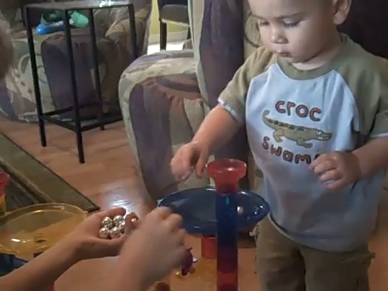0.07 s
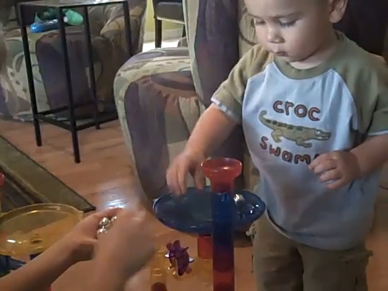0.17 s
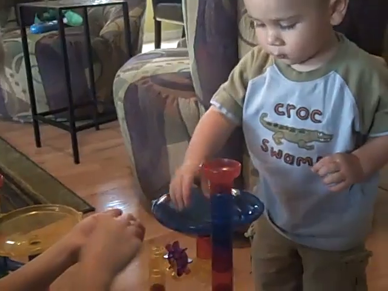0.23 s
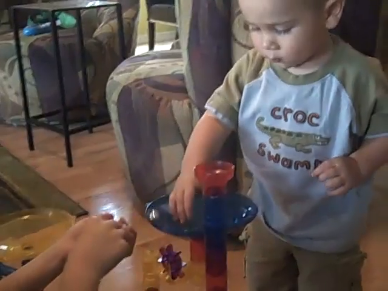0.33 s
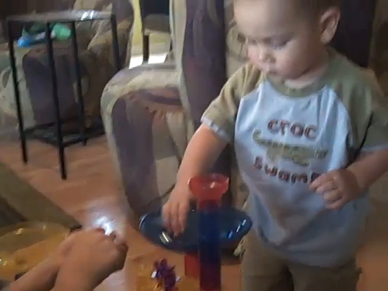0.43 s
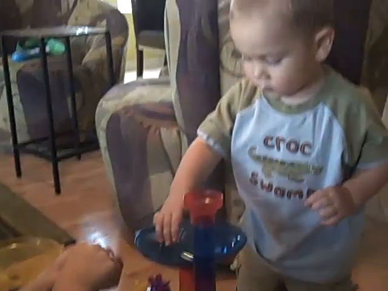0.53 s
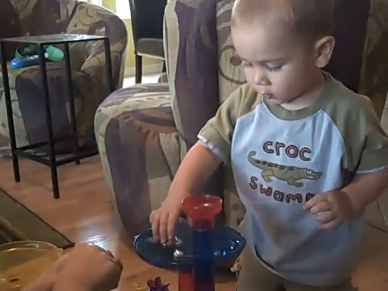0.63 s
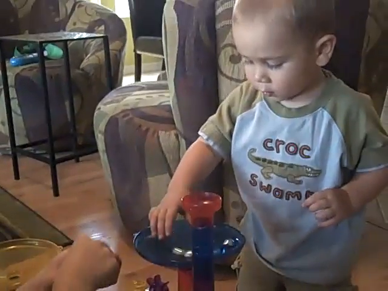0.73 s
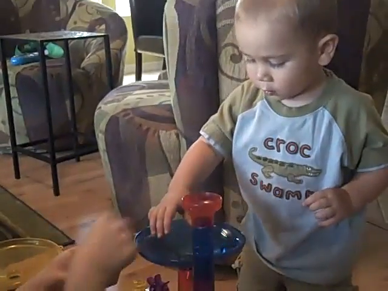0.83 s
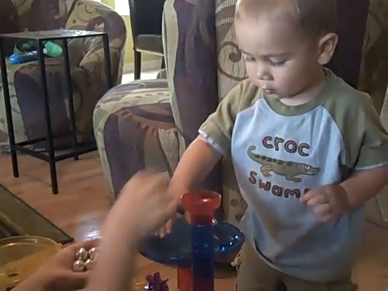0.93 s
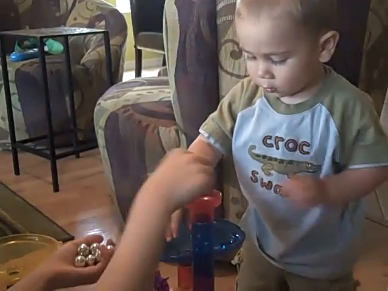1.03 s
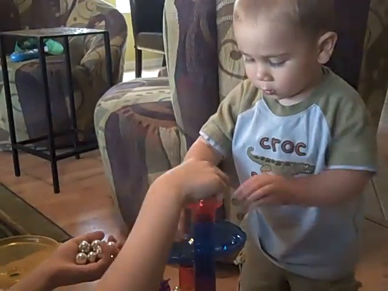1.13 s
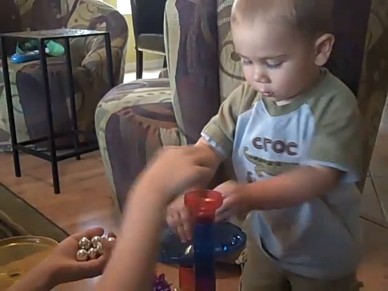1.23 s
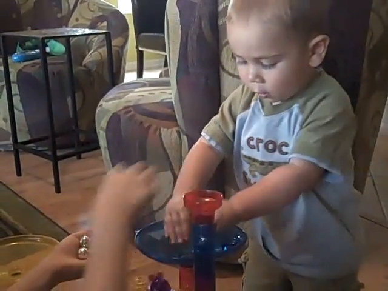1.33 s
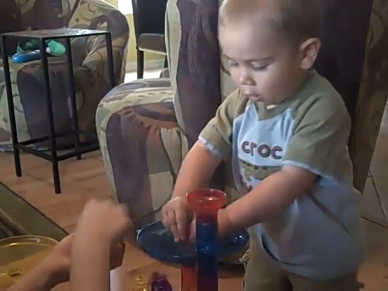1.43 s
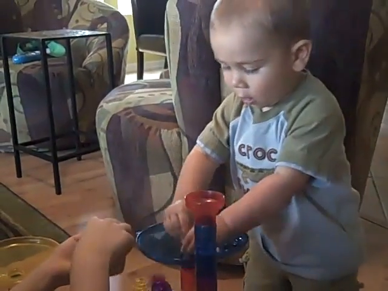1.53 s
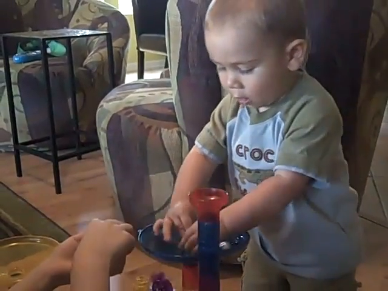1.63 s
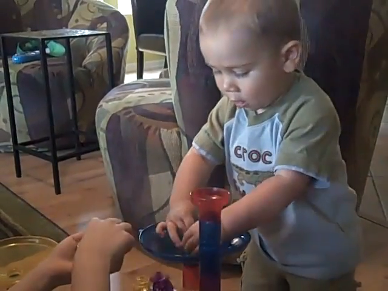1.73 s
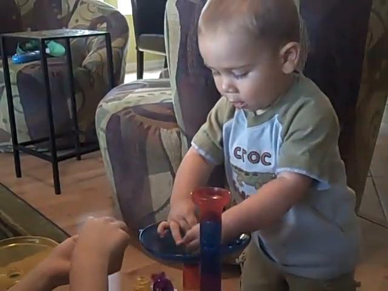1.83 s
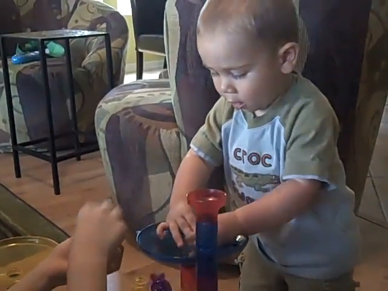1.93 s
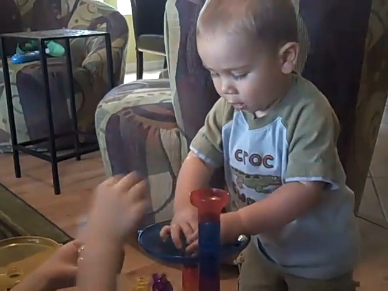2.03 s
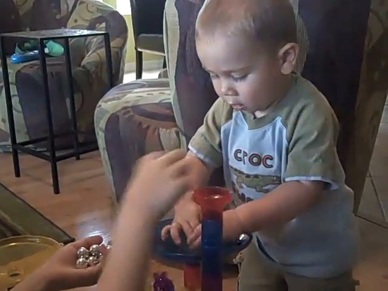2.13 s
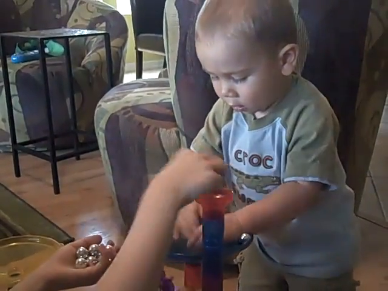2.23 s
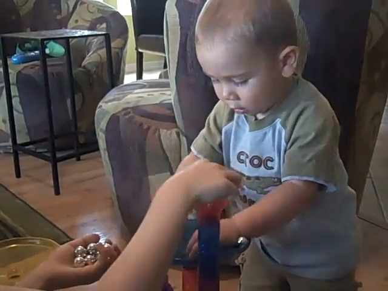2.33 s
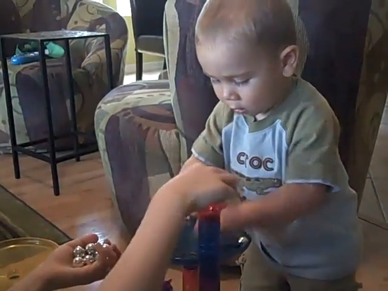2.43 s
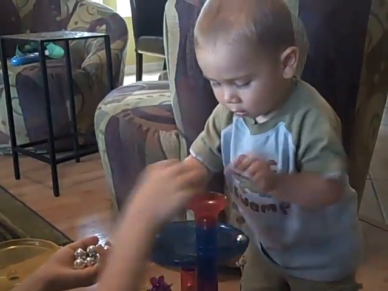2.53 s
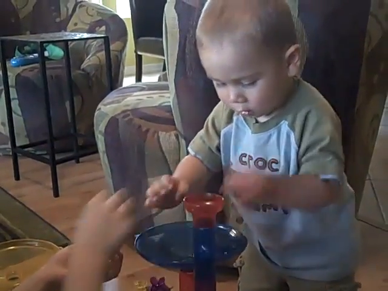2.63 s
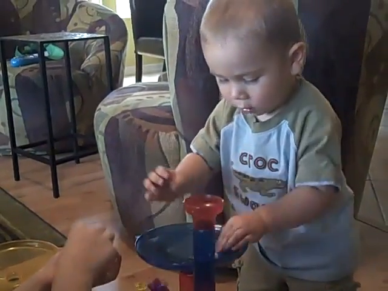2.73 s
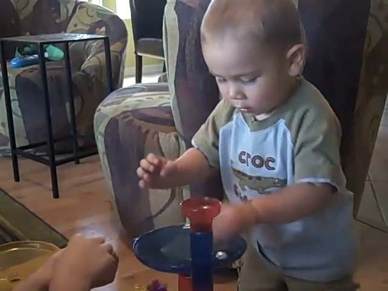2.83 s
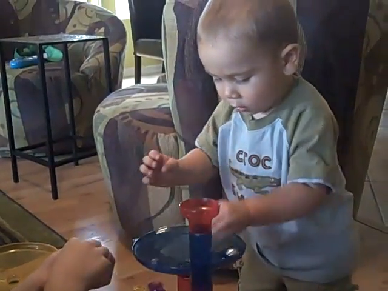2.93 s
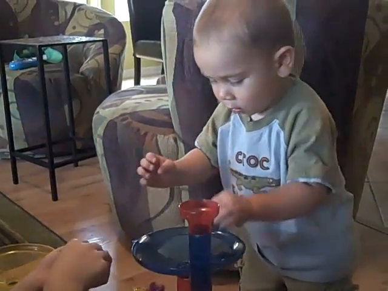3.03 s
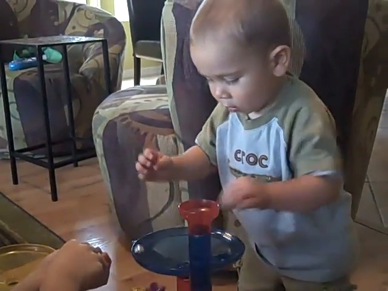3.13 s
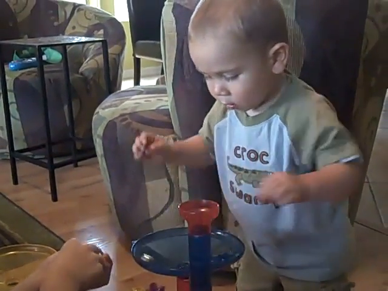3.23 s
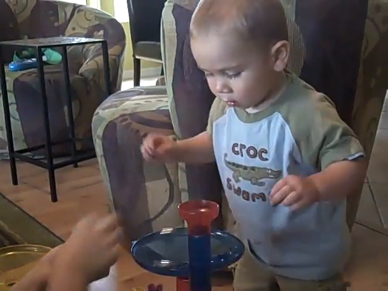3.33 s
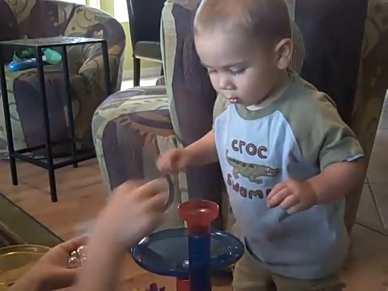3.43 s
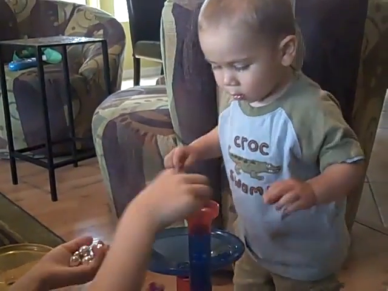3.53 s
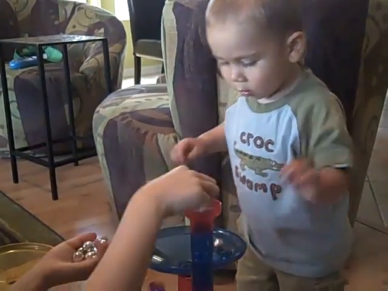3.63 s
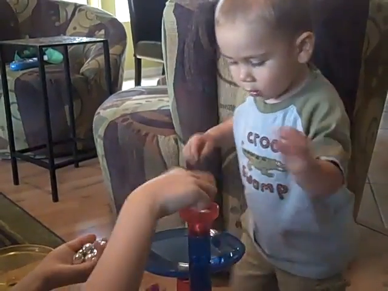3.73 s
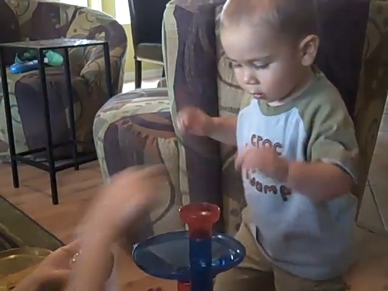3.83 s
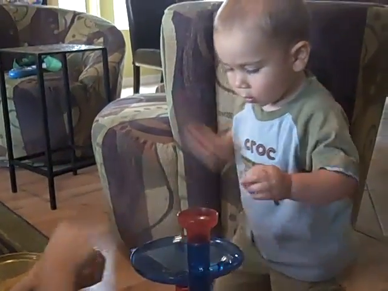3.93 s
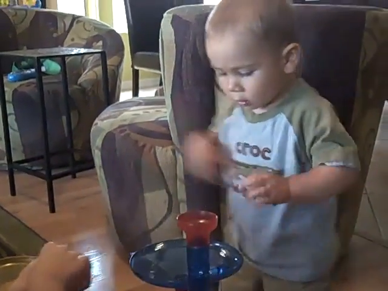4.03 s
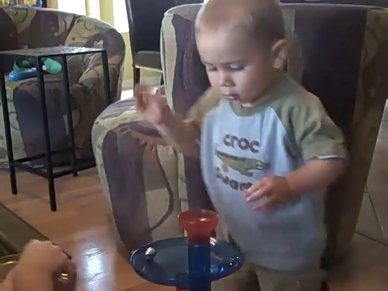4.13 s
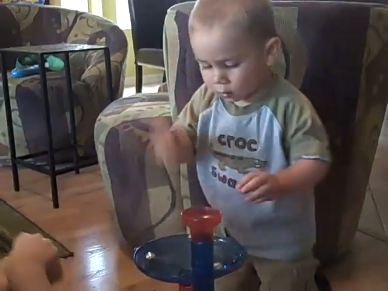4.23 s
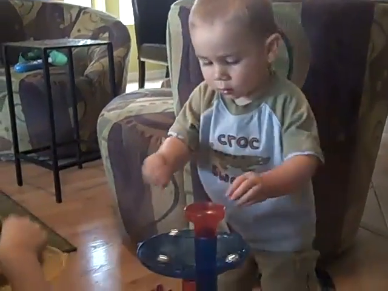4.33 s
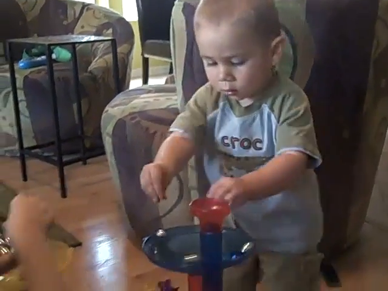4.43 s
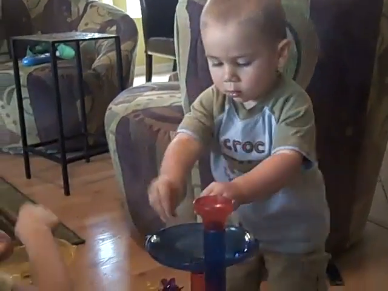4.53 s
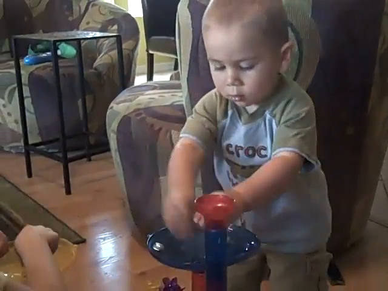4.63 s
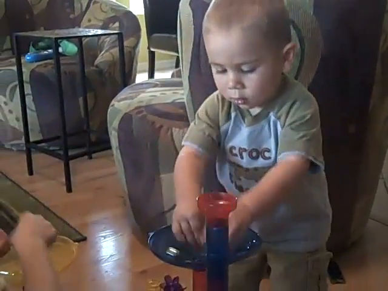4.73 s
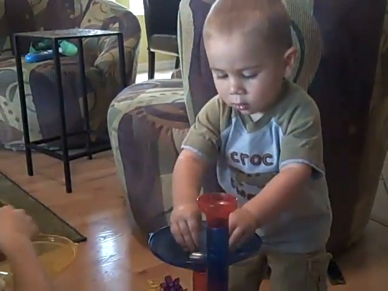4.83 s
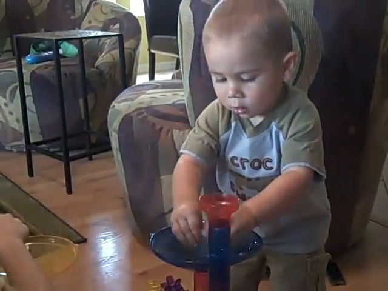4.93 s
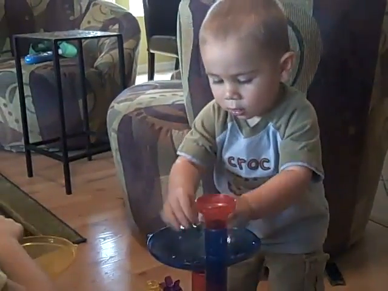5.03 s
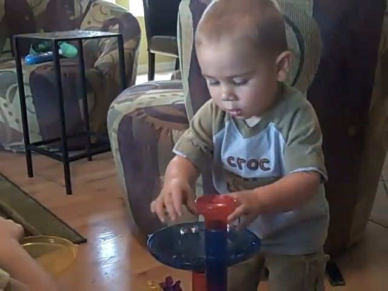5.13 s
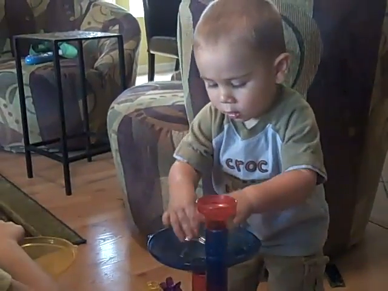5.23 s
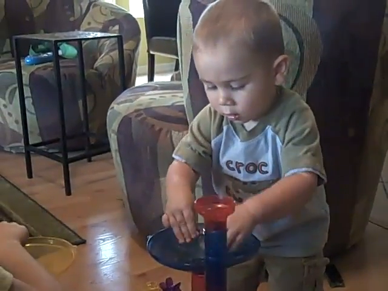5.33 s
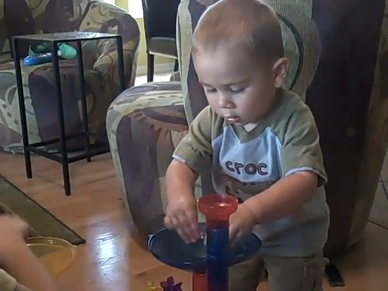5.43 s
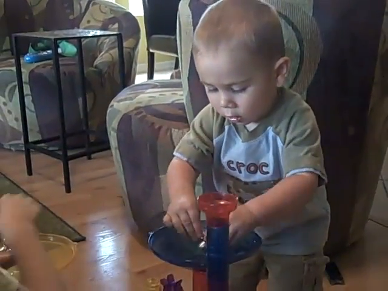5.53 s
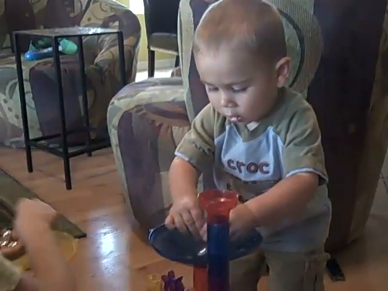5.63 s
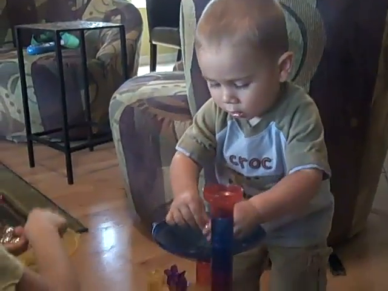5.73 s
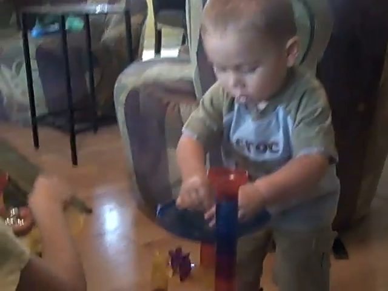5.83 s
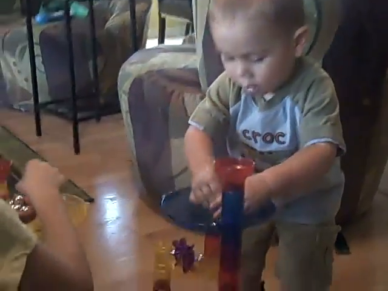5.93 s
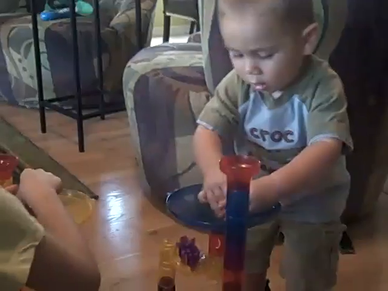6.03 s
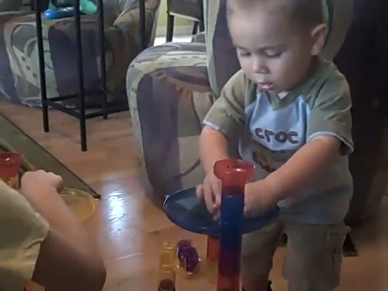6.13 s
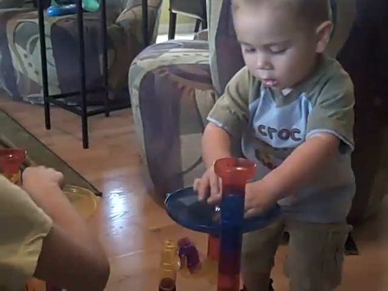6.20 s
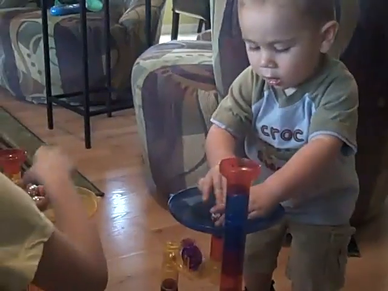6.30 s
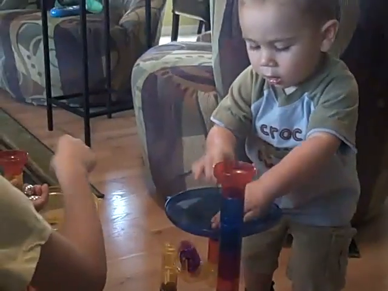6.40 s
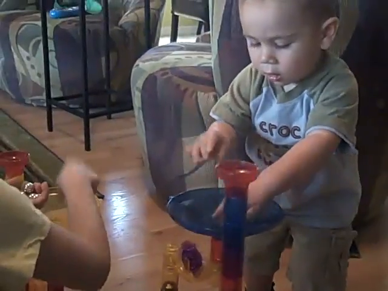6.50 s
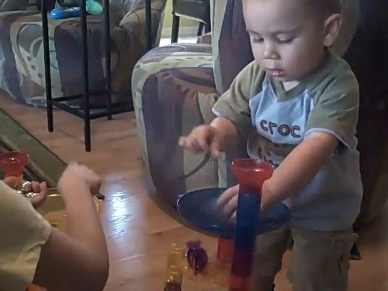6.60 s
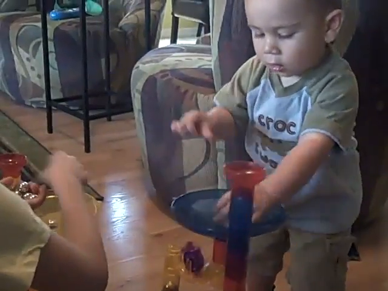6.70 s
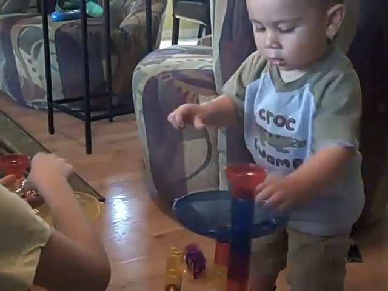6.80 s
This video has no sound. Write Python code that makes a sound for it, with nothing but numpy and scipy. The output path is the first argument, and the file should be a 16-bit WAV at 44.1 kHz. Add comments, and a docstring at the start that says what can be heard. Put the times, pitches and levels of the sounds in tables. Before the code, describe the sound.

Marbles rattle in a plastic toy bowl about a metre from the microphone. It starts silent, then opens on faint room air and weak ticks before a burst of hard clacks. Irregular knocks continue, brighter on rim and tube, hollower on the bowl, with grainy rolling swelling after each. The middle is lighter; the end turns busy and loud. The living room adds a short reverberation, and some strong hits overload with a low pop.

```python
"""A furnished living room with a short tail, the microphone about a metre from a toy marble run.
Marbles roll round its plastic bowl while small hands chase them and more are dropped in: trains of tiny impacts.
They knock the bowl, rim, tubes and each other: noise bursts with rebounds that set thin plastic ringing.
Clinks, bouncing marbles and soft bumps join in over quiet indoor air; some hard hits overload the microphone."""
import sys
import numpy as np
from scipy import signal
from scipy.io import wavfile
from scipy.ndimage import uniform_filter1d

SR = 44100
rng = np.random.default_rng(int(sys.argv[2]) if len(sys.argv) > 2 else 0)


def file_out(sig):
    """Save sig as 16-bit WAV at sys.argv[1]."""
    # one column per channel
    cols = np.atleast_2d(sig).T
    # limit, then scale
    lim = np.clip(cols, -1, 1)
    pcm = np.round(lim * 32767).astype(np.int16)
    wavfile.write(sys.argv[1], SR, pcm)


N = 302600

# spectrum of the quiet indoor air: freq_hz, relative gain_db
AIR_COLOUR = [(20, 5), (250, -10.5), (600, -7), (2000, -36.5), (16000, -53)]
# reverberation of the living room: freq_hz, t60_s
ROOM_DECAY = [(200, 1), (1400, 0.57), (4000, 0.56), (9000, 0.31), (16000, 0.44)]
# how briskly the marbles move between knocks: start_s, relative roll_db, relative skitter_db
MOTION = [(0.37, -44.5, -51.5), (0.79, -46, -53), (1.07, -43, -70), (1.43, -49.5, -44.5), (2.16, -45, -39),
          (2.59, -47.5, -49), (2.72, -44, -37.5), (3.7, -44, -45), (4.04, -43.5, -34), (4.24, -53, -45.5),
          (4.51, -48.5, -50), (4.89, -43, -37), (5.39, -47, -42.5), (5.72, -51, -49), (5.97, -37, -29.5),
          (6.12, -41, -37), (6.32, -43.5, -39.5), (6.86, -38.5, -35.5)]
# spectrum of the rolling: freq_hz, relative gain_db
ROLL_COLOUR = [(100, -15), (400, -12.5), (800, -5), (1300, -2.5), (2000, 1), (3000, 1.5), (5000, -30.5),
               (12000, -13)]
# spectrum of the skittering: freq_hz, relative gain_db
SKITTER_COLOUR = [(300, -2.5), (1200, -6), (2500, -2), (3700, 2), (5000, -1), (7000, -4.5), (10000, -5),
                  (13000, -11.5), (16000, -8)]
# modes of the bowl: pitch_hz, width_hz, relative level_db
BOWL_MODES = [(694, 31, -13), (996, 25, 3), (1220, 45, -49), (1265, 32, 1), (1405, 55, 2), (1523, 47, 2),
              (1612, 39, -3), (1870, 17, 4.5), (1943, 68, -8.5), (2600, 870, -2.5), (2880, 430, -10),
              (3620, 110, 4.5), (3680, 51, 5)]
# modes of the upright tube: pitch_hz, width_hz, relative level_db
TUBE_MODES = [(3500, 35, -1), (3590, 24, 4)]
# soft hollow bumps: start_s, relative level_db, pitch_hz
BUMPS = [(3.918, -41, 640), (4.18, -37, 590)]
# low pulses of the overloaded microphone at some hard hits: hit_s, relative level_db
OVERLOADS = [(1.296, -20.5), (1.542, -30), (1.816, -40.5), (2.118, -41), (2.902, -39), (3.251, -32.5),
             (3.991, -36.5), (4.083, -44), (4.817, -31.5), (5.91, -31.5), (6.674, -34), (6.765, -38)]
# small hard contacts that ring on one note: start_s, level_db, pitch_hz
CLINKS = [(1.0758, -25, 3240), (1.4576, -30, 3620), (2.1084, -30.5, 6000), (2.207, -36, 4140),
          (2.851, -29, 8250), (2.9023, -29, 9400), (6.2343, -35.5, 3300), (6.4886, -25.5, 9230)]
# a marble bounces on one hard, ringing spot: start_s, level_db, pitch_hz, first_flight_s
BOUNCES = [(1.2973, -32.5, 3580, .0385), (5.405, -32.5, 3460, 0.018)]
# a marble hits plastic and may chatter on: start_s, level_db, spot_pitch_hz,
# hardness as treble tilt_db_per_octave, chatter_s
KNOCKS = [(0.253, -37.5, 2050, -2.5, 0.0098), (0.4478, -32, 7750, -1, 0.074), (0.804, -34, 1530, -5, 0.067),
          (0.92, -22, 4280, 1.5, 0.036), (0.9831, -26.5, 1620, 1.5, 0.037), (1.034, -26, 1480, 2.5, 0),
          (1.064, -20.5, 3150, -2, 0.026), (1.0853, -23.5, 1640, 3, 0.0066),
          (1.1142, -24, 1340, -6.5, 0.013), (1.1444, -24, 1340, -0.5, 0.015),
          (1.2967, -22.5, 9500, 3, 0.016), (1.3359, -22, 8300, -0.5, 0.006),
          (1.5151, -19.5, 3220, 1.5, 0.045), (1.524, -19.5, 3330, -3.5, 0.0048),
          (1.543, -18.5, 5070, 0.5, 0.058), (1.755, -27.5, 3300, 2.5, 0.013), (1.825, -23, 2750, 3, 0.029),
          (1.892, -20.5, 7400, 2.5, 0), (1.9943, -27, 3900, 4.5, 0.005), (2.021, -25.5, 7050, 7, 0.048),
          (2.1199, -24, 6500, 5.5, 0.0081), (2.2196, -25.5, 4740, 3, .032),
          (2.2859, -24.5, 1650, -1.5, 0.021), (2.3024, -22, 1530, 0, 0.043),
          (2.373, -29, 4800, -0.5, 0.018), (2.4238, -29, 2490, 1.5, 0.0017),
          (2.509, -25.5, 3640, 1.5, 0.0066), (2.572, -27.5, 3550, 1, 0.078),
          (2.6639, -23, 1660, -2.5, 0.019), (2.7408, -29, 1440, -1.5, 0), (2.7829, -28.5, 3420, 1.5, 0.016),
          (2.8308, -25.5, 3900, 3, 0.056), (2.986, -31.5, 4130, -1.5, 0.0068),
          (3.0947, -27, 3700, 1, 0.029), (3.14, -26, 3780, 2, 0.028), (3.2519, -23.5, 5700, 4, 0),
          (3.318, -31.5, 3020, -0.5, 0.035), (3.4028, -27.5, 5830, 2, 0.02),
          (3.4264, -27.5, 3100, 3.5, 0.059), (3.6114, -30, 1430, -0.5, 0), (3.695, -24.5, 3080, 6.5, 0.027),
          (3.875, -31, 8600, -0.5, 0), (3.915, -25.5, 3300, 2.5, .016), (3.993, -26, 8200, 4, .055),
          (4.0832, -26.5, 6030, 6, 0.0066), (4.208, -26.5, 3800, 5.5, .025), (4.4381, -32.5, 3980, 0, 0),
          (4.5302, -31, 2430, -2, 0), (4.6124, -30.5, 3670, 7, 0), (4.7085, -27, 2640, 0, 0.014),
          (4.7388, -23.5, 5020, 0, 0), (4.8168, -20.5, 2540, 0.5, 0.0086), (4.8832, -24, 1870, -0.5, 0.049),
          (5.0847, -28.5, 5600, -1, 0), (5.211, -23, 2430, 2.5, 0.034), (5.2476, -26.5, 4400, 2, .06),
          (5.375, -26.5, 3470, 4, 0.035), (5.4056, -30, 1870, -2.5, 0.17), (5.664, -28.5, 2830, -0.5, 0),
          (5.711, -27, 2800, -0.5, 0), (5.7824, -31.5, 2920, 1, 0.0066), (5.869, -26, 2070, 0.5, 0.089),
          (5.911, -18.5, 2600, 0.5, 0.004), (5.9191, -28.5, 1280, -9.5, 0), (5.9763, -25, 1580, -1, 0.04),
          (5.9974, -24.5, 1820, -0.5, 0.052), (6.1096, -23.5, 5170, 1, 0.041),
          (6.2433, -25.5, 3220, -3.5, 0.001), (6.341, -24, 4700, -2, 0.014),
          (6.3809, -24.5, 1430, 0, 0.014), (6.4346, -26, 2830, -0.5, 0.0066),
          (6.5205, -21.5, 3300, -3, 0.031), (6.5891, -26.5, 2600, 2.5, 0.013),
          (6.6284, -21, 4040, 3.5, 0.055), (6.675, -21.5, 4900, -0.5, 0.02),
          (6.7379, -19.5, 3780, -0.5, 0.021), (6.7658, -23, 6370, 7, 0.02), (6.83, -27, 1910, -2.5, 0.083)]
# spectrum shared by knocks and the ticks of clinks: freq_hz, relative gain_db
KNOCK_COLOUR = [(100, -27), (400, -24.5), (700, -17), (1000, -10), (1400, 0), (2000, 0.5), (2600, 1),
                (3600, 1), (5000, -3), (7000, -7), (9500, -7.5), (12000, -15.5), (16000, -31)]

# each flight is a share of the one before, and each landing is weaker
FLIGHT_SHARE, LANDING_STEP_DB = 0.68, -0.86
# rebounds follow at uneven gaps, start weaker than the blow and fade
REBOUND_GAP_S, GAP_SPREAD, REBOUND_DB, CHATTER_FADE_DB = 0.0105, 0.4, -5, -5.5
# each rebound lands on a random spot with its own strength; all are equally duller than their blow
SPOT_LOW_HZ, SPOT_HIGH_HZ, REBOUND_SPREAD_DB = 1315, 5830, 4
SOFTER_DB_PER_OCTAVE, TILT_SPREAD_DB = -1, 0
# when the microphone opens, and the top of its band
START_S, EDGE_HZ = 0.181, 16100


def amp(db):
    """Decibels to gain."""
    return 10 ** (np.asarray(db) / 20)


def evened(x):
    """Scales a sound to rms 1."""
    return x / np.sqrt(np.mean(x ** 2) + 1e-20)


def read(points, hz):
    """Reads a table along a log-frequency axis."""
    f, value = np.transpose(points)
    return np.interp(np.log(hz + 1), np.log(f + 1), value)


def add(mix, s, sound):
    """Mixes a sound in at time s."""
    part = mix[max(round(s * SR), 0):][:len(sound)]
    part += sound[:len(part)]


def scatter(count):
    """Random values spread evenly about zero, up to one either way."""
    return 2 * rng.random(count) - 1


def causal(gain_db):
    """The promptest (minimum-phase) impulse response that has this spectrum."""
    mirrored_db = np.concatenate([gain_db, gain_db[-2:0:-1]])
    log_gain = np.log(amp(mirrored_db))
    return np.fft.ifft(np.exp(np.conj(signal.hilbert(log_gain)))).real


def coloured(x, colour, size=2048):
    """Gives a sound a spectrum without blurring its attacks."""
    response = causal(read(colour, np.fft.rfftfreq(size, 1 / SR)))
    return signal.oaconvolve(x, response)[:N]


def at_level(hit, db, size=220):
    """Sets the rms level of the first five milliseconds of a hit."""
    return amp(db) * hit / np.sqrt(np.mean(hit[:size] ** 2))


def indoor_air(air_db=-68):
    """The quiet air of the room: steady noise, strongest in the bass."""
    return amp(air_db) * evened(coloured(rng.standard_normal(N), AIR_COLOUR))


def echoes(first_s=0.0022, size=26400, count=2400):
    """Sparse reflections of random sign, each band dying at its own speed."""
    taps, step = np.zeros(size), size // count
    places = np.arange(count) * step + rng.integers(0, step, count)
    taps[places] = rng.choice([-1., 1.], count)
    taps *= np.arange(size) > first_s * SR
    hz, t, bands = signal.stft(taps, SR)
    decay = amp(-60 * t / read(ROOM_DECAY, hz)[:, None])
    tail = signal.istft(bands * decay, SR)[1]
    return tail / np.linalg.norm(tail)


def room(x, laps_per_s=1.7, count=5):
    """As the marbles circle, their sound crossfades between several paths through the room."""
    lap = laps_per_s * np.arange(N) / SR
    facing = [np.cos(2 * np.pi * (lap - k / count)) for k in range(count)]
    shares = np.maximum(np.array(facing), 0) ** 2
    shares /= np.linalg.norm(shares, axis=0)
    return sum(signal.oaconvolve(x * share, echoes())[:N] for share in shares)


def contact(snap_s, size=1024):
    """One impact: a noise burst with a slightly softened start, a fast decay and a faint slower one."""
    t = np.arange(size) / SR
    rise_s, linger_s, linger_db = 0.0004, 0.004, -16
    decay = np.exp(-t / snap_s) + amp(linger_db) * np.exp(-t / linger_s)
    return rng.standard_normal(size) * (1 - np.exp(-t / rise_s)) * decay


def ring(x, modes, laps_per_s=0):
    """Thin plastic rings in its modes; a circling marble crosses their nodes, so each swells and fades."""
    out, lap = np.zeros(N), laps_per_s * np.arange(N) / SR
    for k, (hz, width, db) in enumerate(modes):
        reach = 1 - np.sin(np.pi * (k + 2) * lap) ** 2 / 2  # steady when laps_per_s is 0
        mode = signal.lfilter(*signal.iirpeak(hz, hz / width, SR), x * reach)
        out += (-1) ** k * amp(db) * mode
    return out


def skips(per_s, spread_db, snap_s, low_hz, high_hz, count=24, size=3000):
    """A levelled random train of tiny impacts, mostly small, on many spots that each favour their own pitch."""
    strength = amp(spread_db * np.minimum(rng.exponential(1, N), 2))
    strength *= rng.random(N) < per_s / SR
    spot, train = rng.integers(0, count, N), np.zeros(N)
    for k, hz in enumerate(np.geomspace(low_hz, high_hz, count)):
        tick = signal.lfilter(*signal.iirpeak(hz, 2, SR), contact(snap_s))
        train += signal.oaconvolve(strength * (spot == k), evened(tick))[:N]
    running_power = uniform_filter1d(train ** 2, size)
    return train / np.sqrt(running_power + 1e-9)


def stirring(settle_s=0.012, size=16384):
    """Every knock stirs the other marbles; they keep moving while it chatters, then settle."""
    power, t = np.zeros(N), np.arange(size) / SR
    for s, db, _, _, chatter_s in KNOCKS:
        settling = np.exp(-np.maximum(t - chatter_s, 0) / settle_s)
        add(power, s, (amp(db) * settling) ** 2)
    return np.sqrt(power)


def rolling(roll_db=-1, skitter_db=-1, shell_db=-11, stirred_roll_db=-18, stirred_skitter_db=-23):
    """Rolling marbles drum finely on the bowl; jostled ones skitter in brighter ticks; both swell after a knock."""
    s, roll, skitter = np.transpose(MOTION)
    t, stirred = np.arange(N) / SR, stirring()
    drumming = skips(per_s=420, spread_db=4, snap_s=0.0015, low_hz=986, high_hz=3470)
    drumming = coloured(drumming, ROLL_COLOUR)
    ticks = skips(per_s=110, spread_db=6, snap_s=0.00038, low_hz=2100, high_hz=11100)
    ticks = coloured(ticks, SKITTER_COLOUR)
    drone = evened(ring(drumming, BOWL_MODES, laps_per_s=0.7) + amp(shell_db) * drumming)
    roll_gain = np.hypot(amp(np.interp(t, s, roll) + roll_db), amp(stirred_roll_db) * stirred)
    skitter_gain = np.hypot(amp(np.interp(t, s, skitter) + skitter_db), amp(stirred_skitter_db) * stirred)
    return drone * roll_gain + evened(ticks) * skitter_gain


def bumps(size=4096):
    """Dull, hollow thumps with a soft start: a short note and noise round the same pitch."""
    out, t = np.zeros(N), np.arange(size) / SR
    ring_s, rise_s = 0.004, 0.001
    envelope = np.exp(-t / ring_s) * (1 - np.exp(-t / rise_s))
    for s, db, hz in BUMPS:
        scuff = evened(signal.lfilter(*signal.iirpeak(hz, 1.5, SR), rng.standard_normal(size)))
        note = np.sin(2 * np.pi * hz * t) / 2
        add(out, s, amp(db) * (note + scuff) * envelope)
    return out


def overloads(pulse_s=0.00012, delay_s=0.00092, gain_db=9, tail_db=-42, tail_s=0.11, tail_hz=32, size=16384):
    """Low pulses of the overloaded microphone at some hard hits, each with a faint deep noise tail as it recovers."""
    out, t = np.zeros(N), np.arange(size) / SR
    pulse = -t / pulse_s * np.exp(1 - t / pulse_s)
    lowpass = signal.butter(2, tail_hz, fs=SR)
    for s, db in OVERLOADS:
        tail = evened(signal.lfilter(*lowpass, rng.standard_normal(size))) * np.exp(-t / tail_s)
        add(out, s + delay_s, amp(db + gain_db) * (pulse + amp(tail_db) * tail))
    return out


def clink(db, hz, ring_cycles=8, tick_db=-4, size=1024):
    """A tick and a note that dies within a few cycles."""
    t, rise_s = np.arange(size) / SR, 0.0003
    colour = causal(read(KNOCK_COLOUR, np.fft.rfftfreq(size, 1 / SR)))
    envelope = np.exp(-t * hz / ring_cycles) * (1 - np.exp(-t / rise_s))
    note = np.sin(2 * np.pi * hz * t) * envelope
    tick = signal.fftconvolve(contact(snap_s=0.00022), colour)[:size]
    return at_level(note, db) + at_level(tick, db + tick_db)


def clinks(count=5):
    """Single clinks, and marbles that bounce ever faster as each flight shortens."""
    out = np.zeros(N)
    for s, db, hz in CLINKS:
        add(out, s, clink(db, hz))
    for s, db, hz, flight_s in BOUNCES:
        for k in range(count):
            add(out, s, clink(db + k * LANDING_STEP_DB, hz))
            s += flight_s * FLIGHT_SHARE ** k
    return out


def blow(db, spot_hz, tilt, spot_db=7, spot_width=0.061, pivot_hz=3700, size=1024):
    """A blow brings out the resonance of the spot it lands on; hard contacts are bright and short."""
    hz = np.fft.rfftfreq(size, 1 / SR)
    octaves = np.log2(np.maximum(hz, 1000) / pivot_hz)
    spot = amp(spot_db) / (1 + ((hz - spot_hz) / (spot_width * spot_hz)) ** 2)
    colour = causal(read(KNOCK_COLOUR, hz) + tilt * octaves + 20 * np.log10(1 + spot))
    burst = contact(snap_s=0.0019 * amp(-tilt))
    return at_level(signal.fftconvolve(burst, colour), db)


def knocks(count=8):
    """Each knock is one blow, then up to count weaker rebounds from spot to spot while the marble chatters."""
    out = np.zeros(N)
    for s, db, spot_hz, tilt, chatter_s in KNOCKS:
        add(out, s, blow(db, spot_hz, tilt))
        lags = np.cumsum(REBOUND_GAP_S * (1 + GAP_SPREAD * scatter(count)))
        spots = SPOT_LOW_HZ * (SPOT_HIGH_HZ / SPOT_LOW_HZ) ** rng.random(count)
        fades = CHATTER_FADE_DB * lags / (chatter_s + REBOUND_GAP_S)
        levels = db + REBOUND_DB + fades + REBOUND_SPREAD_DB * scatter(count)
        tilts = tilt + SOFTER_DB_PER_OCTAVE + TILT_SPREAD_DB * scatter(count)
        for lag, *rebound in zip(lags, levels, spots, tilts):
            still_chattering = lag < chatter_s
            add(out, s + lag, blow(*rebound) * still_chattering)
    return out


def scene(bowl_db=-7, room_db=-7):
    """Knocks ring the bowl and clinks ring the tube; the toy excites the room; air and overload pulses do not."""
    knocking, clinking = knocks(), clinks()
    bowl = amp(bowl_db) * ring(knocking, BOWL_MODES)
    tube = ring(clinking, TUBE_MODES)
    toy = knocking + bowl + clinking + tube + rolling() + bumps()
    air = indoor_air()
    return (toy + amp(room_db) * room(toy) + overloads() + air)[None]


def record(dry):
    """The microphone, silent at first, opens just after the start; then its band limit."""
    live = dry * (np.arange(N) > START_S * SR)
    lowpass = signal.firwin(255, EDGE_HZ, window=("kaiser", 9), fs=SR)
    return signal.oaconvolve(live, lowpass[None], "same")


dry = scene()
out = record(dry)
file_out(out)
```